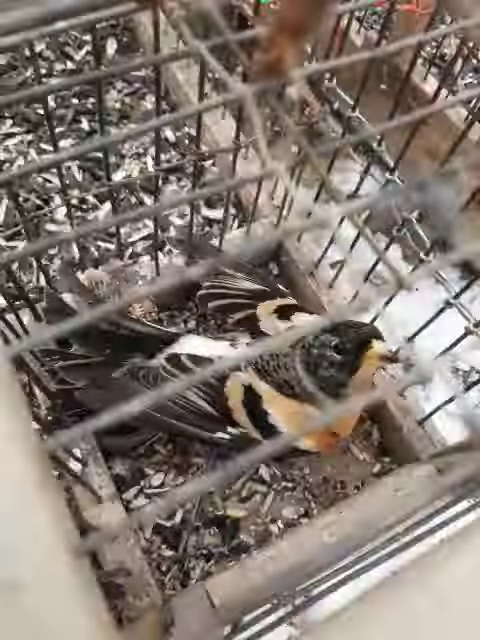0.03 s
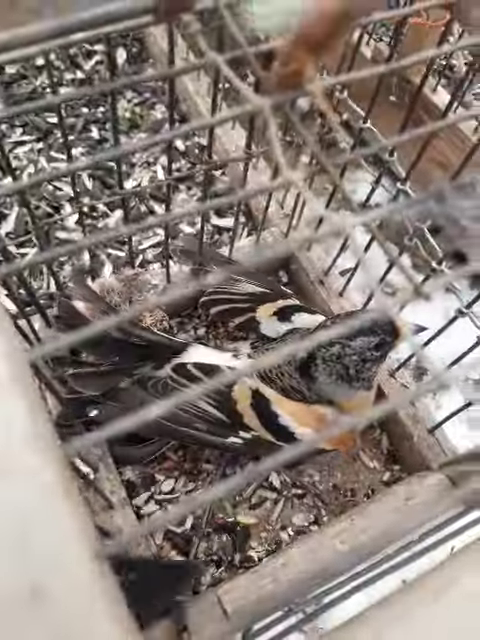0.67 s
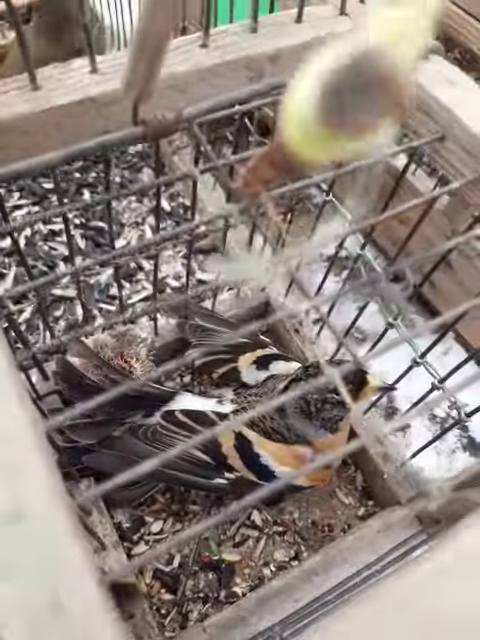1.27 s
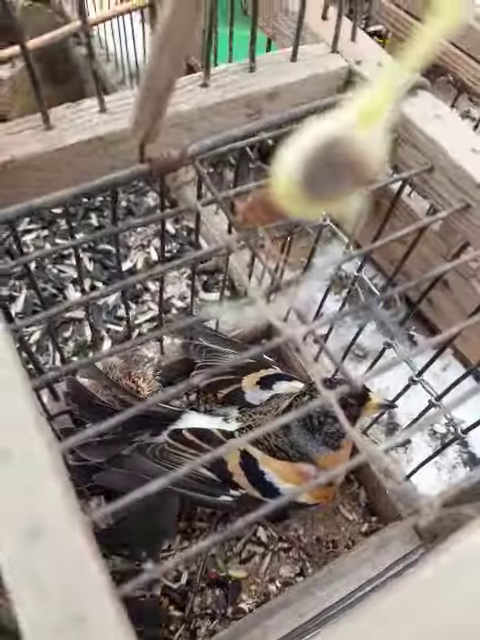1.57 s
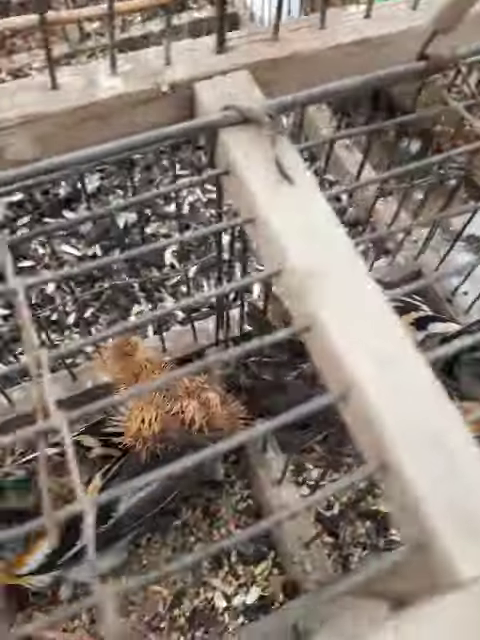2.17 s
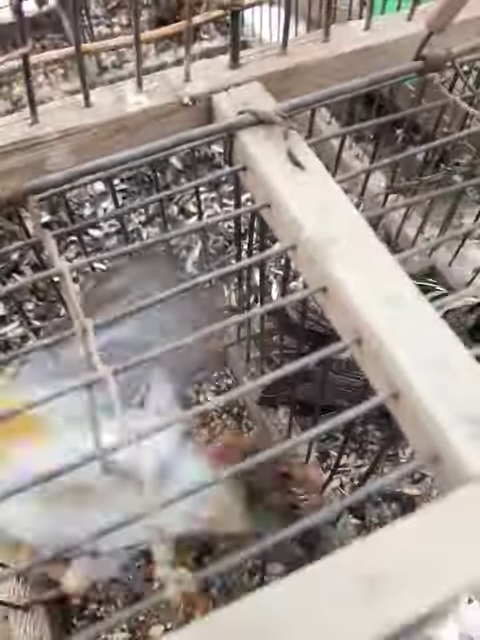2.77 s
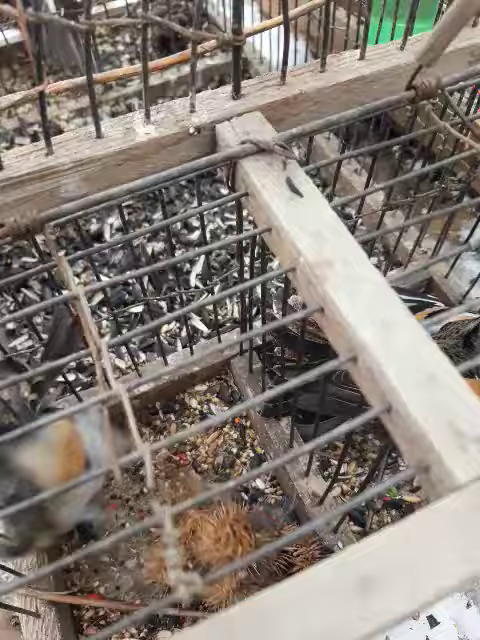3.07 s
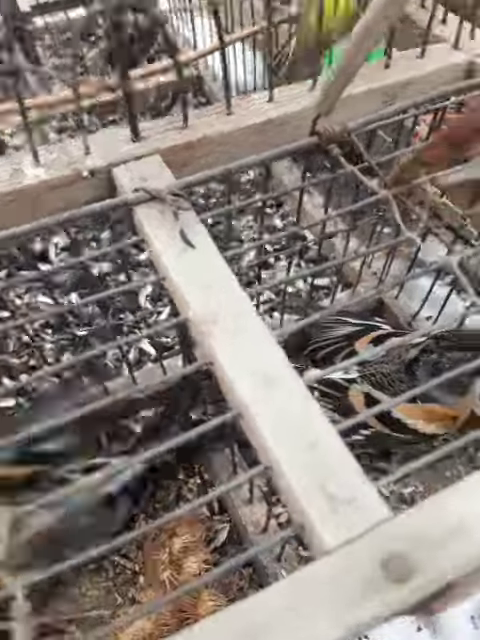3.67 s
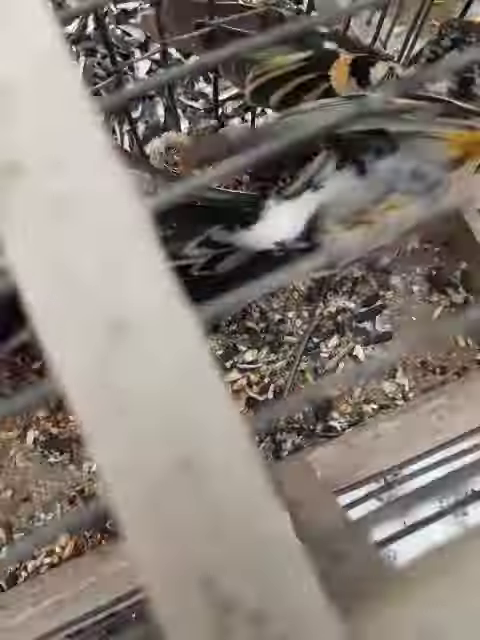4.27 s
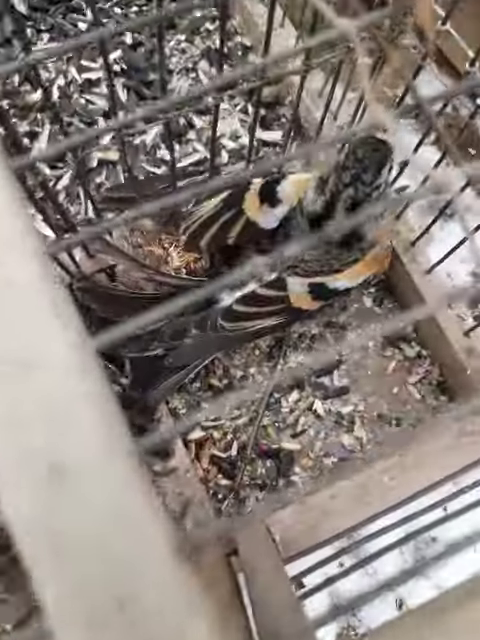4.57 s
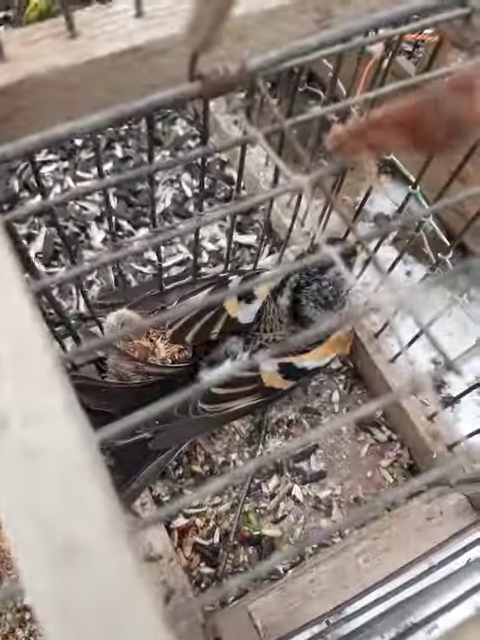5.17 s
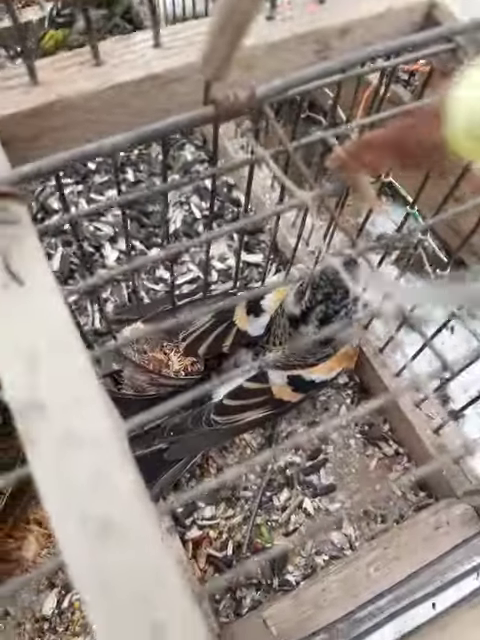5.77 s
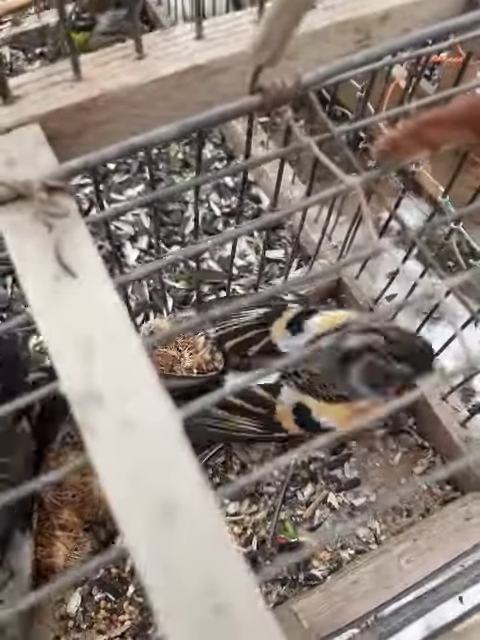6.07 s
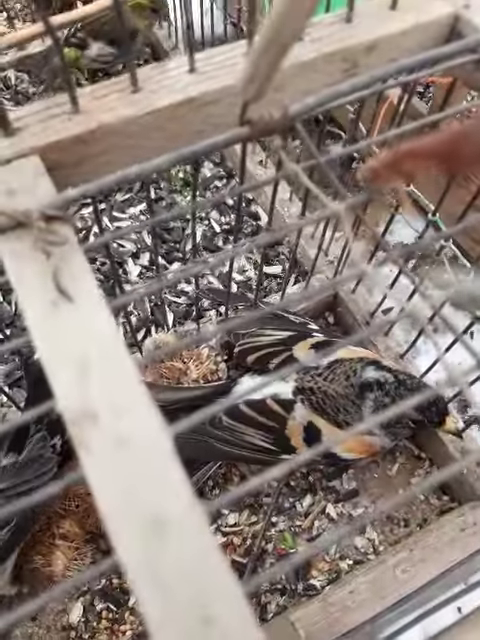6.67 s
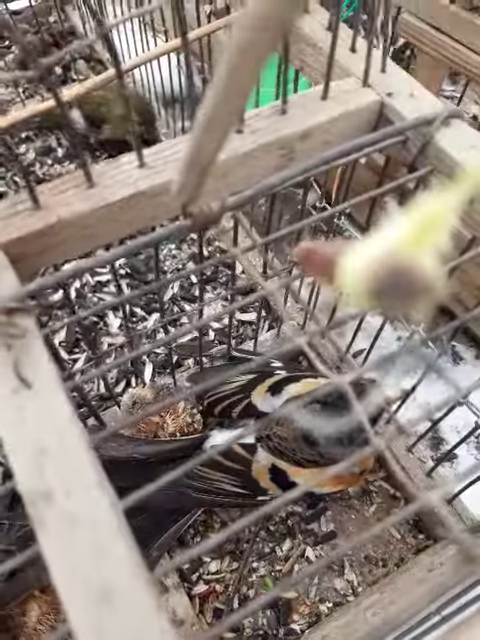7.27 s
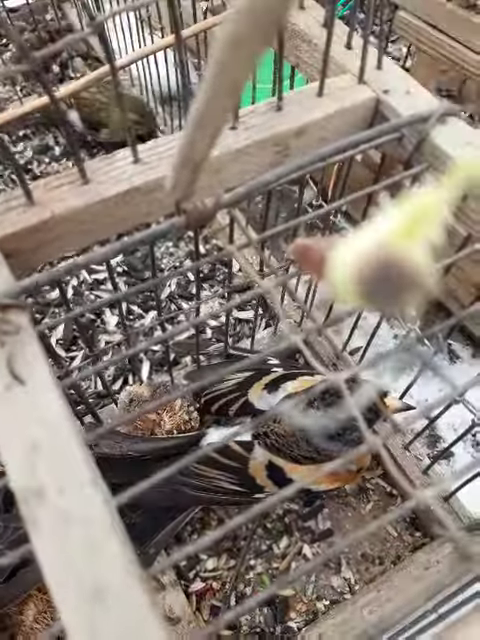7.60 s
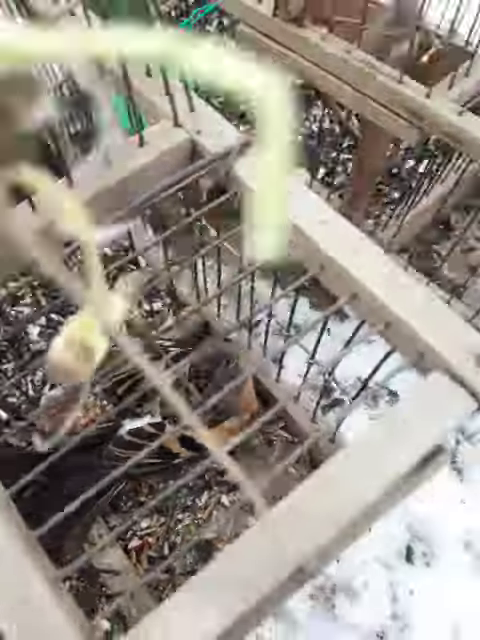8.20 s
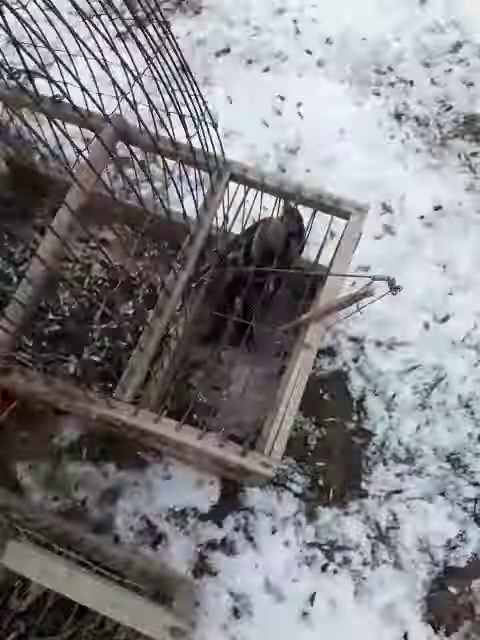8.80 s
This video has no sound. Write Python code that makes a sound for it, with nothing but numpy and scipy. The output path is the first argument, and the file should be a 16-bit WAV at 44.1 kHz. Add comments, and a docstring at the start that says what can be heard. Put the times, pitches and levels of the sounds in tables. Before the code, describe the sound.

Small birds rustle through dry seed husks and flutter against a wooden wire cage, with sharp ticks and scuffs of claws and beaks.

```python
"""Outdoors, at a wooden trap cage with wire bars, right under a phone: finches shuffle and flutter.
Feet and feathers stir a bed of dry seed husks; wing strokes slap the bars and thump the frame;
claws and beaks tick, squeak and scuff on wire and wood. Near the end, three soft, hollow thuds,
perhaps footsteps or a distant dog, sound over a faint low rumble."""
import sys
import numpy as np
from scipy import signal
from scipy.fft import rfft, irfft
from scipy.io import wavfile
from scipy.ndimage import uniform_filter1d

SR = 44100
rng = np.random.default_rng(int(sys.argv[2]) if len(sys.argv) > 2 else 0)


def to_wav(s):
    """Save 16-bit WAV."""
    ch = np.atleast_2d(s).T  # columns
    pcm = np.round(np.clip(ch, -1, 1) * 32767)  # PCM
    wavfile.write(sys.argv[1], SR, pcm.astype(np.int16))


N = 398663
TIME_S = np.arange(N) / SR

# wing strokes on the cage: centre_s, half_length_s, crackle_db, thump_db
WING_STROKES = [(0.534, 0.0071, -28, -35), (0.599, 0.0057, -31, -40.5), (0.927, 0.01, -29.5, -35.5),
                (1.528, 0.0054, -29.5, -34), (1.75, 0.002, -27.5, -37.5), (1.771, 0.0032, -29, -36),
                (1.924, 0.0049, -18, -27), (1.999, 0.0033, -17.5, -21.5), (2.014, .004, -27, -37),
                (2.075, 0.0099, -31.5, -37.5), (2.72, 0.0066, -22, -27.5), (2.774, 0.0028, -18, -26),
                (2.828, 0.0031, -26.5, -30.5), (2.853, 0.0048, -33, -34), (2.936, 0.0022, -45, -23),
                (3.054, 0.0053, -28.5, -41), (3.749, 0.0024, -18, -22), (3.855, 0.0077, -25, -41.5),
                (4.158, 0.0022, -15.5, -21.5), (4.223, 0.0056, -21.5, -29), (4.412, 0.0082, -26.5, -34),
                (4.516, 0.0058, -20.5, -28), (4.605, 0.0034, -25, -31), (4.631, 0.0038, -30, -33.5),
                (4.693, 0.0054, -29, -35), (4.719, 0.0051, -26.5, -38.5), (5.94, 0.0068, -22, -36.5),
                (6.886, 0.0045, -41, -45), (6.981, 0.0086, -28, -30.5), (8.357, .0058, -29.5, -46),
                (8.5, 0.0053, -34, -37.5), (8.904, .007, -35, -40), (8.974, 0.0089, -25.5, -41.5)]
# low thump spectrum: freq_hz, density_db
THUMP_SPECTRUM = [(25, -47.5), (50, -3), (100, 2), (150, 2), (270, -3.5), (400, -4.5), (700, -7),
                  (1500, -44.5), (4000, -65.5)]
# hard contact spectrum: freq_hz, density_db
CLICK_SPECTRUM = [(100, -14.5), (800, -1.5), (2200, 2), (3100, -2.5), (4200, 6.5), (6000, 3), (8600, 9),
                  (10100, -14), (12000, -5.5), (16000, -4)]


def undb(db):
    return 10 ** (np.asarray(db) / 20)


def unit_rms(x):
    return x / np.sqrt(np.mean(x ** 2) + 1e-18)


def add(out, start_s, x):
    start = max(int(start_s * SR), 0)
    out[start:start + len(x)] += x[:max(N - start, 0)]


def colour(x, spectrum, size=1024):
    """Minimum-phase filter through (freq_hz, density_db) points; white noise keeps its power."""
    hz, db = np.transpose(spectrum)
    grid_hz = np.maximum(np.arange(size + 1) * SR / (2 * size), 1)
    gain = undb(np.interp(np.log(grid_hz), np.log(hz), db))
    cepstrum = irfft(np.log(gain))
    cepstrum[1:size] *= 2
    cepstrum[size + 1:] = 0
    response = irfft(np.exp(rfft(cepstrum)))
    return signal.fftconvolve(x, response / np.linalg.norm(response))[:len(x)]


def resonate(x, centre_hz, *widths_hz):
    """Resonators in series, one per width; gain 1 at the centre."""
    for width_hz in widths_hz:
        x = signal.lfilter(*signal.iirpeak(centre_hz, centre_hz / width_hz, fs=SR), x)
    return x


def steady(x, span_s):
    """Level the power over span_s; finer grain stays."""
    power = np.abs(uniform_filter1d(x ** 2, max(int(span_s * SR), 2)))
    return x / np.sqrt(power + 1e-12)


def trail(impulses, decay_s):
    """Exponential tail on each impulse."""
    return signal.lfilter([1], [1, -np.exp(-1 / (decay_s * SR))], impulses)


def flicker(rate_hz):
    """Gaussian values joined by straight lines."""
    return np.interp(TIME_S * rate_hz, np.arange(N), rng.standard_normal(N))


def crackle(per_s, spread_db, grain_s):
    """Tiny fractures of random time and size, each a short noise burst."""
    onsets = rng.random(N) < per_s / SR
    sizes = undb(spread_db * np.clip(rng.standard_normal(N), -2, 2.3))
    return np.sqrt(trail(onsets * sizes ** 2, grain_s)) * rng.standard_normal(N)


def patchy(x, depth_db, rate_hz):
    """Each contact has its own colour: nine overlapping bands swell and fade independently."""
    spectrum = rfft(x)
    freq_hz = np.clip(np.arange(len(spectrum)) * SR / N, 250, 10000)
    band_position = 1.5 * np.log2(freq_hz / 250)
    out = np.zeros(N)
    for band in range(9):
        share = np.maximum(1 - np.abs(band_position - band), 0)
        out += irfft(spectrum * share, N) * undb(depth_db * flicker(rate_hz))
    return out


def frame_ring(x, waver_db):
    """Frame and bar resonances; their mix shifts as the contact point wanders."""
    # centre_hz, width_hz, gain_db
    modes = [(595, 31, -3.5), (1288, 170, 0), (1832, 300, 0), (2316, 380, 4), (2585, 160, -4),
             (3685, 310, 2.5), (4330, 960, -1), (6730, 1200, -2.5)]
    return sum(undb(db + waver_db * flicker(rate_hz=20)) * resonate(x, hz, width_hz, width_hz)
               for hz, width_hz, db in modes)


def distant_rumble():
    """Faint, wavering outdoor rumble."""
    # freq_hz, density_db
    air_spectrum = [(25, -17.5), (55, -2.5), (97, 3), (140, -8), (300, -17.5), (700, -27), (2300, -31),
                    (8400, -32.5), (10500, -53), (16000, -37)]
    return undb(-63.5 + 1.8 * flicker(rate_hz=9.1)) * colour(rng.standard_normal(N), air_spectrum)


def hollow_thuds(thud_hz=198, rise_s=0.049):
    """Three soft, hollow thuds about 0.4 s apart, perhaps footsteps or a distant dog."""
    # start_s, level_db
    thuds = [(7.414, -55), (7.815, -52), (8.174, -46.5)]
    envelope = np.zeros(N)
    t = np.arange(SR // 2) / SR
    for start_s, level_db in thuds:
        add(envelope, start_s, undb(level_db) * (t / rise_s * np.exp(1 - t / rise_s)) ** 2)
    hollow = steady(resonate(rng.standard_normal(N), thud_hz, 16, 41), span_s=0.047)
    thump = colour(rng.standard_normal(N), THUMP_SPECTRUM)
    return envelope * (hollow + undb(-3.5) * thump)


def cage_echo(birds, decay_s=0.022, panel_hz=618):
    """Nearby boards scatter a short, weak tail; one panel rings on."""
    t = np.arange(SR // 6) / SR
    tail = rng.standard_normal(len(t)) * np.exp(-t / decay_s) * (t > 0.002)
    boards = signal.fftconvolve(birds, tail / np.linalg.norm(tail))[:N]
    return undb(-15.5) * boards + undb(-0.5) * resonate(birds, panel_hz, 2.1)


def stirring(attack_s=0.0078, release_s=0.018, scatter_db=-16.5, scatter_s=0.04, pause_db=-7.5):
    """Husk level and treble envelopes: steady stirring, shuffles, scatter after strokes, pauses."""
    # steady stirring: time_s, level_db, treble_db
    activity = [(0.0, -42, -42), (0.5, -46.5, -49), (0.75, -48.5, -44), (1.36, -55, -50), (1.94, -41, -34),
                (2.14, -46.5, -57), (2.42, -47, -48.5), (2.77, -45.5, -33), (2.89, -37, -33),
                (3.3, -44.5, -41), (3.5, -48, -46), (4.2, -51.5, -46), (4.38, -41.5, -43),
                (4.58, -44.5, -42.5), (5.03, -73.5, -75), (5.89, -64, -68), (6.07, -48, -50),
                (6.27, -56.5, -70), (6.49, -53, -61), (6.65, -52, -59), (7.1, -55, -55), (7.3, -61.5, -66),
                (7.53, -73.5, -71), (8.18, -47, -49.5), (8.51, -37, -35), (9.04, -40, -34.5)]
    # a bird wades through husks: start_s, length_s, level_db
    shuffles = [(0.178, 0.11, -49), (0.715, 0.034, -47.5), (0.862, 0.079, -41), (1.029, 0.026, -47),
                (1.21, 0.1, -52), (1.429, 0.078, -51.5), (1.734, 0.065, -38.5), (2.474, 0.071, -46),
                (2.771, 0.096, -35.5), (3, 0.18, -47.5), (3.387, 0.072, -41), (3.816, 0.11, -39.5),
                (3.974, 0.027, -43.5), (4.167, 0.15, -37.5), (4.379, 0.052, -37), (4.598, 0.047, -40.5),
                (4.682, 0.016, -47), (4.728, 0.18, -54), (5.865, 0.024, -49.5), (5.959, 0.13, -48),
                (6.54, 0.19, -51.5), (7.039, 0.15, -52), (7.238, 0.037, -51), (7.613, .04, -58.5),
                (7.767, 0.13, -54.5), (7.92, 0.018, -50.5), (8.058, 0.056, -52), (8.312, 0.067, -41)]
    # birds hold still: centre_s, half_length_s
    pauses = [(0.388, 0.037), (0.665, 0.014), (.815, .015), (1.403, .03), (3.642, 0.049), (4.09, 0.032),
              (4.348, 0.011), (4.978, 0.038), (5.18, 0.06)]
    kick_power = np.zeros(N)
    for start_s, length_s, db in shuffles:
        attack = np.clip((TIME_S - start_s) / attack_s, 0, 1)
        release = np.exp(-np.maximum(TIME_S - start_s - length_s, 0) / release_s)
        kick_power += (undb(db) * attack * release) ** 2
    settle = np.exp(-TIME_S[:SR // 2] / scatter_s)
    for centre_s, _, crackle_db, _ in WING_STROKES:
        add(kick_power, centre_s, (undb(crackle_db + scatter_db) * settle) ** 2)
    kicked = np.sqrt(kick_power)
    time_s, level_db, treble_db = np.transpose(activity)
    level = np.hypot(undb(np.interp(TIME_S, time_s, level_db) - 1), kicked)
    treble = np.hypot(undb(np.interp(TIME_S, time_s, treble_db) - 2), undb(-0.5) * kicked)
    stillness = sum(np.exp(-((TIME_S - centre_s) / half_s) ** 2) for centre_s, half_s in pauses)
    dip = undb(pause_db * stillness)
    return level * dip, treble * dip


def scratches(per_s=70):
    """Envelope of abrupt, short scratches over a continuous feather scrape."""
    onsets = rng.random(N) < per_s / SR
    sizes = undb(4 * np.clip(rng.standard_normal(N), -2, 1.5))
    return steady(0.6 + trail(onsets * sizes, decay_s=0.007), span_s=0.06)


def husks(level, treble, split_hz=6200):
    """Husks crack and slide underfoot; the cage rings and the floor board rumbles along."""
    # freq_hz, density_db
    rustle_spectrum = [(88, -13), (150, -7), (341, -9), (601, -7.5), (759, -6.5), (1290, -7), (1530, -9),
                       (2270, -1), (2870, -3.5), (3700, -2.5), (7180, -7.5), (8230, 1.5), (10200, -16),
                       (14000, -13), (16000, -17.5)]
    scratch = scratches()
    cracks = steady(crackle(per_s=1700, spread_db=5, grain_s=0.0008), span_s=0.025) * scratch
    rustle = steady(patchy(colour(cracks, rustle_spectrum), depth_db=4.5, rate_hz=70), span_s=0.034)
    dull = signal.sosfilt(signal.butter(4, split_hz, fs=SR, output="sos"), rustle)
    bright = signal.sosfilt(signal.butter(4, split_hz, "high", fs=SR, output="sos"), rustle)
    cage = steady(frame_ring(rng.standard_normal(N), waver_db=4.5), span_s=0.015) * scratch
    knocks = steady(crackle(per_s=200, spread_db=4.5, grain_s=0.0023), span_s=0.05)
    board = colour(scratch * knocks, THUMP_SPECTRUM)
    # light moves mostly ring the cage; heavy ones crush husks and shake the board
    weight = np.clip(level / undb(-43.5), 0.05, 1) ** 0.5
    crush = weight * (undb(-1) * unit_rms(dull) + undb(-12) * board)
    ring = undb(-0.5) * (1 - 0.3 * weight) * cage
    return level * (crush + ring) + undb(-1.8) * treble * unit_rms(bright)


def seeds(level, treble, per_s=34, split_hz=6200):
    """Flicked seeds click and ring on wire and wood, as hard as the birds stir."""
    clicks, rings = np.zeros(N), np.zeros(N)
    t = np.arange(SR // 30) / SR
    for when, pitch, size in rng.random((int(per_s * N / SR), 3)):
        start_s, pitch_hz = when * N / SR, 1300 + 7400 * pitch
        envelope = treble if pitch_hz > split_hz else level
        force = envelope[int(when * N)] * undb(10 * (size - 1))
        strike = rng.standard_normal(len(t)) * np.exp(-t / 0.0012)
        add(clicks, start_s, force * unit_rms(strike))
        add(rings, start_s, force * unit_rms(resonate(strike, pitch_hz, 300, 600)))
    return undb(-2) * colour(clicks, CLICK_SPECTRUM) + undb(-4) * rings


def foot_scuffs(attack_s=0.00069):
    """A foot drags on wood or wire: the spot sings in its own band and rings the frame."""
    # start_s, level_db, decay_s, spot_hz
    scuffs = [(0.444, -40, 0.015, 2310), (0.701, -43, 0.095, 1430), (0.83, -34.5, 0.033, 1390),
              (1.001, -33, 0.01, 2000), (1.108, -47, 0.032, 1290), (1.256, -33, 0.0062, 1470),
              (1.6, -33.5, 0.017, 1910), (2.246, -29, 0.0051, 1450), (2.5, -33, 0.018, 2280),
              (4.247, -28, 0.011, 3700), (4.854, -35.5, 0.018, 3720), (5.268, -43.5, 0.03, 2270),
              (5.409, -51, 0.037, 2300), (5.51, -42.5, 0.01, 1860), (5.643, -51.5, 0.047, 4140),
              (6.439, -43, 0.082, 2210), (7.631, -60, 0.053, 3470), (7.824, -34.5, 0.0059, 2180),
              (7.929, -48, 0.013, 3660)]
    drag, spots = np.zeros(N), np.zeros(N)
    t = np.arange(SR // 4) / SR
    for start_s, level_db, decay_s, spot_hz in scuffs:
        force = undb(level_db) * np.exp(-t / decay_s) * (1 - np.exp(-t / attack_s))
        spot = resonate(rng.standard_normal(len(t)), spot_hz, 503, 550)
        add(drag, start_s, force)
        add(spots, start_s, force * steady(spot, span_s=0.004))
    grit = steady(crackle(per_s=1000, spread_db=13, grain_s=0.00098), span_s=0.0072)
    frame = steady(frame_ring(grit, waver_db=7), span_s=0.036)
    return undb(-2) * drag * frame + undb(-6) * spots


def claw_squeaks(attack_s=0.0017, jitter_rad=0.11):
    """A claw slips along a bar: a brief, rough tone."""
    # start_s, level_db, pitch_hz, length_s
    slips = [(1.717, -27, 3700, 0.012), (1.945, -22, 3880, .008), (1.957, -13, 3680, 0.0059),
             (3.909, -26, 3800, 0.011), (4, -23, 8100, 0.0068), (4.932, -47, 3720, 0.021),
             (6.041, -17, 3720, 0.0076), (6.226, -35, 3890, 0.014)]
    out = np.zeros(N)
    t = np.arange(SR // 15) / SR
    for start_s, level_db, pitch_hz, length_s in slips:
        phase = 2 * np.pi * pitch_hz * t + jitter_rad * np.cumsum(rng.standard_normal(len(t)))
        envelope = (1 - np.exp(-t / attack_s)) * np.exp(-(t / length_s) ** 2)
        add(out, start_s, undb(level_db) * envelope * np.sin(phase))
    return undb(-2.5) * out


def ticks(ring_share=0.32):
    """A claw or beak hits with a millisecond crack; the touched husk or wire rings."""
    # start_s, level_db, pitch_hz
    contacts = [(.538, -17.5, 7200), (.942, -28, 7500), (.991, -31, 2130), (1.003, -33, 7600),
                (1.235, -30, 7700), (1.276, -30, 7500), (1.485, -33, 4740), (1.762, -14, 8650),
                (2.702, -23.5, 7560), (2.723, -19, 7240), (2.777, -17, 8500), (2.919, -21, 2280),
                (2.936, -20.5, 2120), (3.057, -22.5, 8100), (3.693, -27, 6560), (3.762, -16.5, 8140),
                (3.888, -25.5, 8200), (4.314, -26, 7800), (4.603, -22, 3570), (4.63, -22, 6850),
                (4.7, -17, 2490), (5.024, -46.5, 8250), (5.101, -53.5, 8480), (5.644, -42, 4380),
                (5.924, -25.5, 8700), (5.939, -18, 1700), (6.003, -30, 5460), (6.081, -32, 4440),
                (6.224, -29, 8340), (6.526, -33, 8200), (6.544, -34, 2600), (6.834, -29, 9020),
                (6.932, -29.5, 7650), (6.961, -26, 8700), (7.151, -35, 7960), (7.53, -49.5, 8540),
                (7.934, -38.5, 8150), (8.334, -16.5, 8000), (8.527, -27, 8050), (8.574, -21.5, 8500),
                (8.622, -25, 5040), (8.893, -19, 8900)]
    cracks, rings = np.zeros(N), np.zeros(N)
    t = np.arange(SR // 30) / SR
    snap = np.exp(-t / 0.0012) + 0.15 * np.exp(-t / 0.003)
    for start_s, level_db, pitch_hz in contacts:
        crack = rng.standard_normal(len(t)) * snap
        ring = resonate(crack, pitch_hz, 200)
        add(cracks, start_s, undb(level_db) * np.sqrt(1 - ring_share) * unit_rms(crack))
        add(rings, start_s, undb(level_db) * np.sqrt(ring_share) * unit_rms(ring))
    return undb(-12.5) * (colour(cracks, CLICK_SPECTRUM) + rings)


def slap(t, half_s):
    """Force of a wing that meets the bars abruptly, then slides off."""
    contact = 0.5 + 0.5 * np.tanh((t + 1.5 * half_s) / 0.0008)
    return (0.2 + 0.8 * contact) * np.exp(-0.25 * (t / half_s) ** 2)


def wings(tip_lag_s=0.014, quick_half_s=0.003):
    """Stiff feathers rattle across the bars while each stroke thumps the frame."""
    # freq_hz, density_db
    feather_spectrum = [(300, -4.5), (850, -6.5), (1250, 0), (1600, -4.5), (2100, 2.5), (3100, -2.5),
                        (4200, 0), (5900, -3.5), (7300, -2), (8600, 3.5), (10100, -15), (12000, -10.5),
                        (16000, -13)]
    rattle, push = np.zeros(N), np.zeros(N)
    t = np.arange(-0.03, 0.08, 1 / SR)
    settle = (t > 0) * np.exp(-np.abs(t) / 0.016)
    for centre_s, half_s, crackle_db, thump_db in WING_STROKES:
        swell = slap(t, half_s)
        # the wing tip whips in late, harder after a quick stroke
        tip_gain = undb(-3) * min(quick_half_s / half_s, 1) ** 2
        tip = tip_gain * slap(t - tip_lag_s, half_s=0.0036)
        add(rattle, centre_s + t[0], undb(crackle_db) * np.maximum(np.hypot(swell, tip), 0.2 * settle))
        add(push, centre_s + t[0], undb(thump_db) * np.maximum(swell, 0.21 * settle))
    barbs = crackle(per_s=1800, spread_db=6.5, grain_s=0.00095)
    feathers = steady(patchy(colour(barbs, feather_spectrum), depth_db=2.5, rate_hz=90), span_s=0.0065)
    frame = steady(colour(barbs, THUMP_SPECTRUM), span_s=0.0033)
    return undb(0.13) * rattle * feathers + undb(-0.5) * push * frame


def scene():
    """Birds, cage and outdoor background, mono."""
    level, treble = stirring()
    litter = husks(level, treble) + seeds(level, treble)
    birds = litter + wings() + ticks() + claw_squeaks() + foot_scuffs()
    return (birds + cage_echo(birds) + hollow_thuds() + distant_rumble())[None]


def record(dry):
    """The phone's port rings in the upper treble; deepest bass and very top are cut."""
    port_hz, low_cut_hz, high_cut_hz = 8600, 52, 16000
    ported = dry + 0.094 * resonate(dry, port_hz, 600)
    lean = signal.sosfilt(signal.butter(2, low_cut_hz, "high", fs=SR, output="sos"), ported)
    return signal.sosfilt(signal.ellip(10, 0.2, 70, high_cut_hz, fs=SR, output="sos"), lean)


dry = scene()
out = record(dry)
to_wav(out)
```